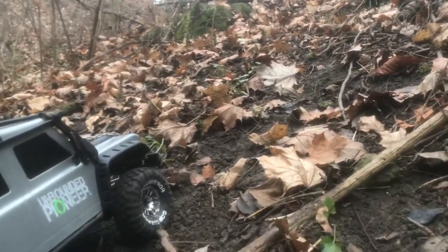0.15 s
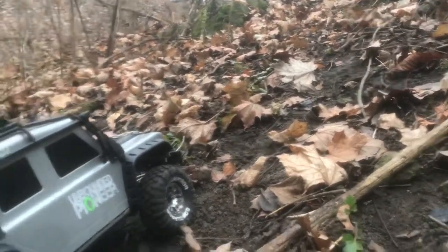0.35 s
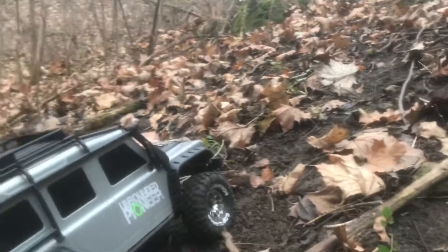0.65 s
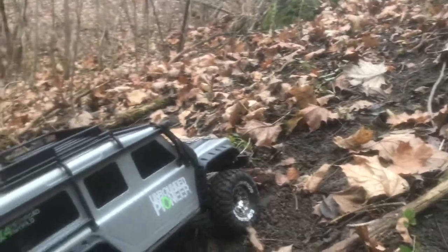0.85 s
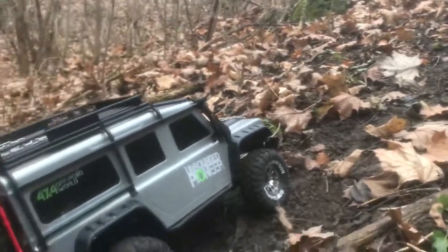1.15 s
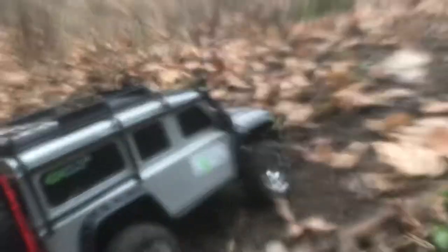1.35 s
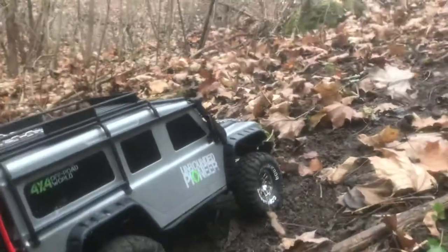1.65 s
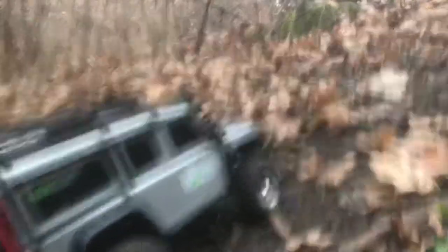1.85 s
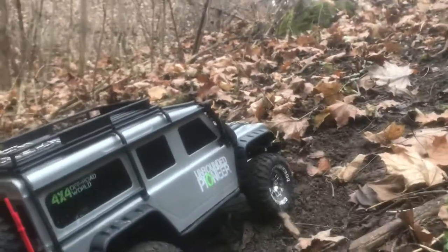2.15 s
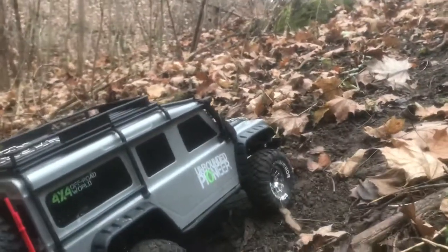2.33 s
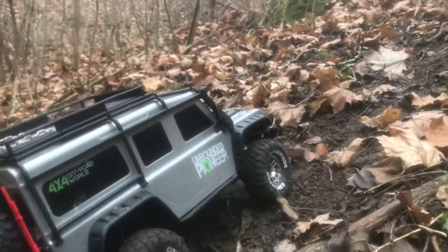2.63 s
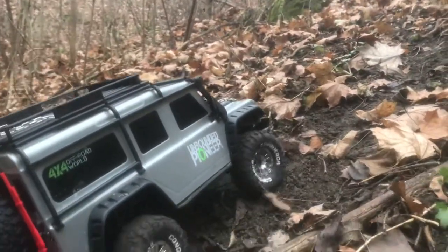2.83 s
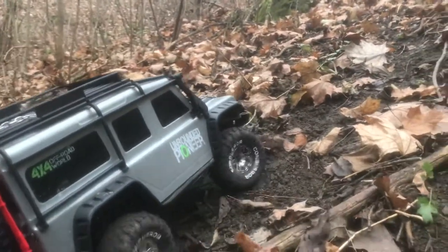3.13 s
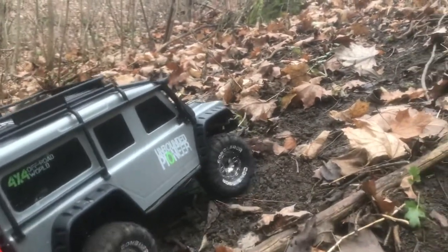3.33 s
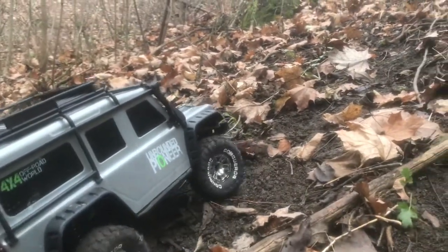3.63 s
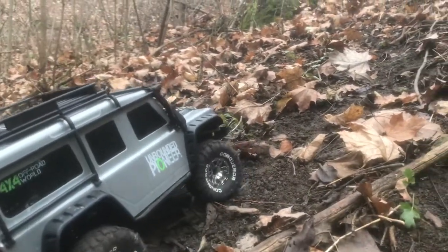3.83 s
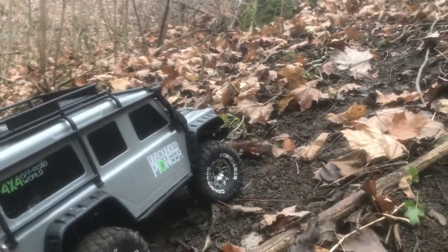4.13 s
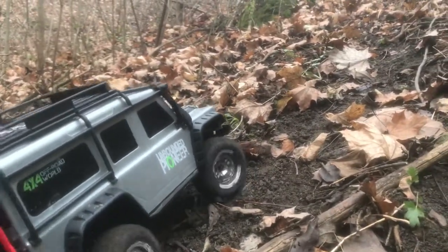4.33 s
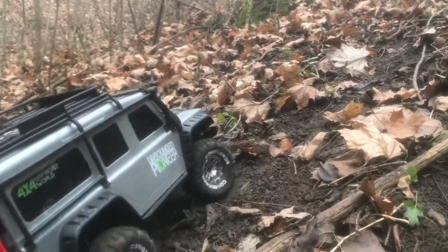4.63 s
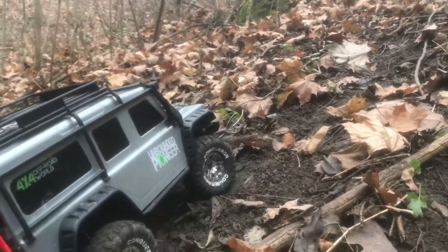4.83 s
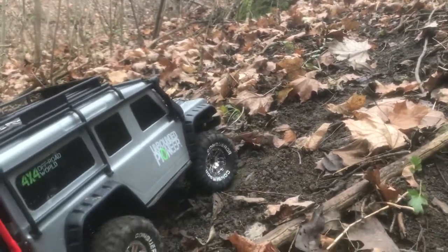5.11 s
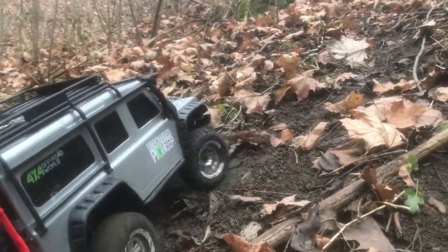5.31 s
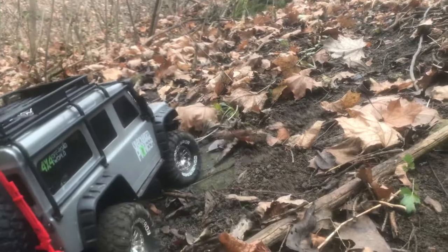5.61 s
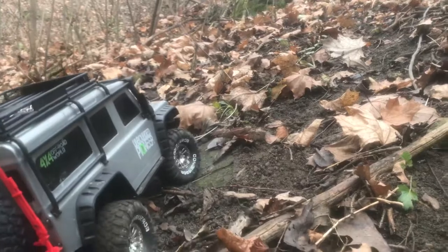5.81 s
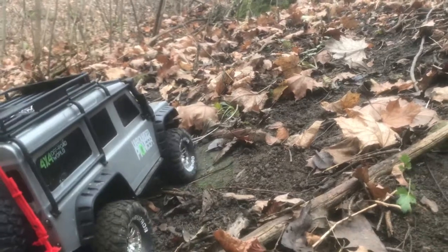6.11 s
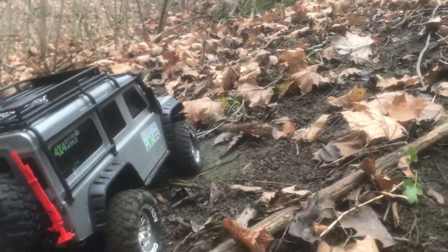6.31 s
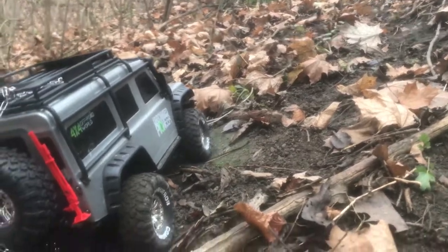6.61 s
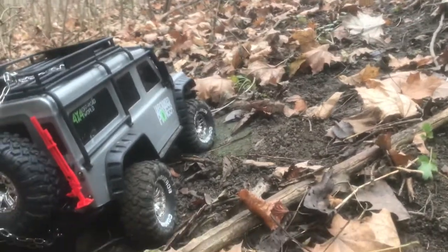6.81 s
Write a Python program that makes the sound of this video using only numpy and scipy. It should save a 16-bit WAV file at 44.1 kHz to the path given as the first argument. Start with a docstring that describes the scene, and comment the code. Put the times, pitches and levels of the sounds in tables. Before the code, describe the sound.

In quiet, echoless woodland with a soft low rumble, a close microphone picks up the low hum and gritty rattle of a model truck's gears. Twigs crack and the chassis knocks as the tyres crunch over dry leaves. The gear noise stops, and the wheels spin twice, scraping soil and crackling leaves. The plastic body clatters, and the electric motor finishes with a few faint, very high whistles over light rustling.

```python
"""Quiet woodland, a slope of soil and dry leaves; the microphone is close to a small electric model truck.
The truck crawls uphill, its gears humming, rattling and rasping with each turn of the shaft. The drive
dies away, then two bursts of wheelspin churn the litter. Twigs snap, blows ring the chassis, the loose
shell clacks and the motor sings thinly at low speed. A low rumble and a far-off hush lie under it all."""
import sys
import numpy as np
from scipy import signal
from scipy.fft import rfft, irfft, next_fast_len
from scipy.io import wavfile
from scipy.ndimage import map_coordinates

SR = 44100
rng = np.random.default_rng(int(sys.argv[2]) if len(sys.argv) > 2 else 0)


def materialize(psi):
    """Save the field psi as 16-bit PCM at rate SR to the path in sys.argv[1].

    A 1-D psi becomes a single channel; in a 2-D psi each row is a channel.
    """
    bounded = np.clip(np.atleast_2d(psi).T, -1, 1)
    quanta = np.round(bounded * 32767).astype(np.int16)
    wavfile.write(sys.argv[1], SR, quanta)


N = 306923


def from_db(db):
    """Decibels to gain."""
    return 10 ** (np.asarray(db) / 20)


def rms_one(x):
    """Scale to unit rms."""
    return x / np.sqrt(np.mean(x ** 2) + 1e-20)


def in_time(rows):
    """Join (time, value) points by straight lines."""
    return np.interp(np.arange(N) / SR, *np.transpose(rows))


def swell(start, length, rise_s, fall_s):
    """Exponential attack up to the start, a hold, then an exponential release."""
    t = np.arange(N) / SR - start
    log_gain = np.minimum(t / rise_s, 0) - np.maximum(t - length, 0) / fall_s
    return np.exp(np.maximum(log_gain, -40))


def coloured(x, spectrum):
    """Give x a spectrum, with minimum phase so that nothing sounds early; rms 1."""
    size = next_fast_len(N + 8192, real=True)
    hz, db = np.transpose(spectrum)
    log_hz = np.log(np.arange(size // 2 + 1) * SR / size + 1)
    skirt_db = 24 * np.minimum(log_hz - np.log(hz[0]), 0)
    gain = from_db(np.interp(log_hz, np.log(hz), db) + skirt_db)
    cepstrum = irfft(np.log(gain), size)
    cepstrum[size // 2:] = 0
    return rms_one(irfft(rfft(x, size) * np.exp(2 * rfft(cepstrum)), size)[:N])


def noise():
    """White noise."""
    return rng.standard_normal(N)


def drift(rate_hz):
    """A smooth random wander with spread 1."""
    r = np.exp(-80 * np.pi * rate_hz / SR)
    slow = signal.lfilter([1], [1, -2 * r, r * r], rng.standard_normal(N // 40 + 2002))[2000:]
    return np.interp(np.arange(N) / 40, np.arange(len(slow)), rms_one(slow))


def ring(times, levels_db, hz, t60):
    """Each blow sets a decaying sine ringing."""
    blows = np.zeros(N)
    blows[np.round(times * SR).astype(int)] = from_db(levels_db)
    r, w = from_db(-60 / (t60 * SR)), 2 * np.pi * hz / SR
    return signal.lfilter([0, np.sin(w)], [1, -2 * r * np.cos(w), r * r], blows + 1e-18)


def resonance(x, hz, width_hz, passes=1):
    """Two-pole band-pass with gain 1 on top; more passes steepen its sides."""
    r = np.exp(-np.pi * width_hz / SR)
    feedback = [1, -2 * r * np.cos(2 * np.pi * hz / SR), r * r]
    for _ in range(passes):
        x = signal.lfilter(np.array([1, 0, -1]) * (1 - r * r) / 2, feedback, x + 1e-18)
    return x


# low rumble of the place: (t/s, level/dB)
RUMBLE_LEVEL = [(0, -44), (.3, -45.5), (1.0, -46), (1.5, -50), (2.3, -47), (3.0, -43.5), (3.7, -42),
                (3.95, -47), (4.4, -40.5), (4.8, -46), (5.3, -42.5), (5.9, -47), (6.96, -48.5)]
# spectra of the rumble and of the distant air: (f/Hz, level/dB)
RUMBLE_SPECTRUM = [(20, -22), (32, -21.5), (48, -10.5), (62, 0), (78, 3.5), (90, -14), (105, -6.5),
                   (160, -24), (300, -77.5)]
AIR_SPECTRUM = [(80, 23), (150, 2), (250, -2.5), (450, -17), (700, -4.5), (1000, 6), (1500, -0.5),
                (2100, -6.5), (4000, -17), (7000, -14), (10400, -23.5), (12500, -13.5), (16000, -23)]

def woodland(air_db=-61):
    """All around the microphone, a low rumble swells and sinks under a faint far-off hush."""
    rumble = from_db(in_time(RUMBLE_LEVEL)) * coloured(noise(), RUMBLE_SPECTRUM)
    return rumble + from_db(air_db) * coloured(noise(), AIR_SPECTRUM)


def crawl(rows, turnover_s=.025):
    """Time away from the motor's top speed, rounded at the turn, and the gain at each resonance."""
    swells = np.array([swell(s, length, rise_s=.025, fall_s=.03) for s, length, *_ in rows])
    _, _, top_s, *levels_db = np.transpose(rows)
    from_top_s = np.arange(N) / SR - top_s[swells.argmax(axis=0)]
    away_s = np.hypot(from_top_s, turnover_s) - turnover_s
    return np.minimum(away_s, .3), from_db(levels_db) @ swells


# the motor's lower and upper resonance: (f/Hz, width/Hz, gain of the clear tone)
MOTOR_MODES = [(9050, 1100, .3), (12250, 1700, 1.0)]
# motor whistles: (t/s, length/s, top speed at t/s, lower level/dB, upper level/dB)
MOTOR_WHISTLES = [(2.675, 0.17, 2.85, -73, -55), (5.78, 0.092, 5.66, -69, -68), (6.0, 0.187, 5.9, -80, -74),
                  (6.52, 0.09, 6.583, -71, -70), (6.69, 0.072, 6.583, -82, -67),
                  (6.8, 0.07, 6.583, -82, -69.5)]

def whistles(sag_per_s=.07, waver=.007, hiss_gain=.9):
    """At a steady crawl each resonance hisses around a thin tone that flattens away from top speed."""
    away_s, gains = crawl(MOTOR_WHISTLES)
    out = 0
    for gain, (hz, width, tone_gain) in zip(gains, MOTOR_MODES):
        pitch = hz * (1 - sag_per_s * away_s + waver * drift(90))
        tone = rms_one(np.cos(2 * np.pi * np.cumsum(pitch) / SR) * from_db(3 * drift(60)))
        hiss = rms_one(resonance(noise(), hz, width, passes=2))
        out += gain * rms_one(tone_gain * tone + hiss_gain * hiss)
    return out


# motor squeaks: (t/s, length/s, top speed at t/s, lower level/dB, upper level/dB)
MOTOR_SQUEAKS = [(5.795, .03, 5.8, -70, -69), (6.568, .13, 6.583, -79, -62)]

def squeaks(top_hz=795, octaves_per_s=2.6, jitter=.003, weak=.25, hiss_gain=1.2, width_hz=3000):
    """The motor speeds up and slows again, so commutation partials arch through its resonances."""
    away_s, gains = crawl(MOTOR_SQUEAKS)
    commutation_hz = top_hz * 2 ** (-octaves_per_s * away_s) * (1 + jitter * drift(67))
    angle = 2 * np.pi * np.cumsum(commutation_hz) / SR
    # multiples of two and three are the strong partials
    partials = [(weak if k % 2 and k % 3 else 1) * np.cos(k * angle) for k in (11, 15, 16, 17, 18, 19)]
    pulses = rms_one(sum(partials))
    return sum(gain * rms_one(resonance(pulses + hiss_gain * noise(), hz, width_hz, passes=2))
               for gain, (hz, *_) in zip(gains, MOTOR_MODES))


# modes of the plastic shell: (f/Hz, level/dB, t60/s)
SHELL_MODES = [(435, -12.5, 0.069), (867, -8, 0.084), (1007, -5, 0.037), (1560, -2.5, 0.037),
               (1770, 1.5, 0.019), (2355, -6, 0.054), (2930, -6, 0.026), (3370, -10.5, 0.021),
               (4184, -6.5, 0.027), (5160, -9, 0.0099), (6230, -15, 0.016)]
# shell hits: (t/s, level/dB, brightness/dB per octave)
SHELL_HITS = [(1.327, -22.5, -5), (1.8308, -25.5, 6), (1.931, -27.5, -2), (2.737, -31.5, -1.5),
              (3.603, -40, 18.5), (3.716, -25.5, 1), (4.143, -39, -8), (4.587, -30, 4), (4.739, -44, -5.5),
              (5.062, -33.5, -1), (5.100, -32.5, 4), (5.189, -36, -8), (5.471, -22.5, -4.5),
              (5.711, -37, 8), (5.7219, -19, 1), (5.7312, -20, 4), (5.745, -24, 3), (5.751, -33, 3),
              (5.835, -39, 5.5), (6.021, -40.5, -6), (6.125, -42, 2), (6.490, -31, 3), (6.661, -31, -3.5)]
# spectrum of gritty contact, for both shell and tyres: (f/Hz, level/dB)
GRIT_SPECTRUM = [(450, -13), (950, 2.5), (1500, 1.5), (2000, -7), (2800, -1.5), (3300, -8), (4100, -8),
                 (5000, -11), (7000, -18.5), (14000, -22)]

def clacks(ring_db=-11, chatter_db=-15, chatter_s=.0095, pitch_spread=.058):
    """The loose shell hits its posts: each spot rings the modes its own way, and the contact chatters."""
    out, t = np.zeros(N), np.arange(4096) / SR
    hz, mode_db, t60 = np.transpose(SHELL_MODES)[:, :, None]
    grit = coloured(noise(), GRIT_SPECTRUM)
    for s, db, tilt in SHELL_HITS:
        span = slice(round(s * SR), round(s * SR) + len(t))
        strength, detune, side = rng.standard_normal((3, len(SHELL_MODES), 1))
        level_db = mode_db + tilt * np.log2(hz / 2000) + 2 * strength - 60 * t / t60
        sines = np.sign(side) * np.sin(2 * np.pi * hz * (1 + pitch_spread * detune) * t)
        ringing = np.sum(from_db(ring_db + level_db) * sines, axis=0)
        chatter = from_db(chatter_db) * np.exp(-t / chatter_s) * grit[span]
        out[span] += from_db(db) * (ringing + chatter)
    return out


# modes of the chassis and of the suspension: (f/Hz, level/dB, t60/s)
CHASSIS_MODES = [(486, -10.5, 0.025), (597, 3, 0.013), (840, -6, 0.017), (1220, -9.5, 0.011),
                 (1605, -16, 0.0082), (2460, -22.5, 0.0069), (3430, -27.5, 0.028), (4240, -27, 0.017)]
SUSPENSION_MODES = [(140, -2.5, 0.013), (223, -1, 0.015)]
# blows on the chassis, the last three rows soft thuds in the soil played the same way: (t/s, knock level/dB,
# thump level/dB, pitch ratio of the struck spot)
CHASSIS_BLOWS = [(1.3212, -8, -6, 0.98), (1.3535, -19, -15.5, 1.07), (1.8295, -16, -22.5, 1.11),
                 (1.882, -28, -45, 1.05), (1.9308, -19.5, -41, 1.13), (5.781, -58, -61, 1.0),
                 (5.929, -46, -68, 1.0), (6.657, -60, -52, 0.69)]

def knocks(jolt_s=.00196, lowest_hz=95):
    """A dull blow rings the chassis and jolts the suspension an instant later."""
    times, knock_db, thump_db, spot_ratios = np.transpose(CHASSIS_BLOWS)
    knock = 0
    for s, blow_db, ratio in zip(times, knock_db, spot_ratios):
        for k, (hz, db, t60) in enumerate(CHASSIS_MODES):
            pitch = hz * ratio if k < 3 else hz   # the lowest modes shift with the struck spot
            knock += (-1) ** k * ring(s, blow_db + db, pitch, t60)
    thump = sum(ring(times + jolt_s, thump_db + db, hz, t60) for hz, db, t60 in SUSPENSION_MODES)
    # the knocks carry no deep bass
    return signal.sosfilt(signal.butter(2, lowest_hz, "high", fs=SR, output="sos"), knock - thump)


# twigs breaking close by: (t/s, level/dB, centre f/Hz, splintering/dB relative to the crack)
TWIG_BREAKS = [(0.205, -21.5, 4000, -6), (1.3236, 4, 6240, -33), (1.3333, -5, 11000, -27),
               (1.3568, -1.5, 6150, -33), (1.3665, -12, 5900, -23), (1.8322, -19, 5860, -9),
               (2.825, -10.5, 6200, -14), (3.392, -18.5, 7000, -8), (3.4514, -22, 5000, -12),
               (3.603, -18, 5000, -10), (3.643, -25, 4000, -6), (3.7191, -16.5, 4470, -17),
               (4.32, -21, 7000, -6), (4.34, -19, 7000, -6), (4.458, -11, 7550, -16),
               (4.471, -17, 7500, -12), (4.5579, -12.5, 4200, -8), (5.078, -21, 9100, -10),
               (5.1202, -24.5, 8000, -8), (5.21, -18, 11000, -6), (5.3448, -13.5, 7040, -6),
               (5.350, -17, 10000, -6), (5.525, -21, 4800, -8), (5.5816, -20.5, 6000, -16),
               (5.7220, -9, 8060, -2), (5.733, -11.5, 8400, -5), (6.491, -25, 8000, -6)]

def snaps(splinter_s=.0021, width_hz=6000, gain_db=-1, hollow=.45):
    """Each twig gives one sharp crack and a brief splintering; the treble is slightly hollow."""
    out, t = np.zeros(N), np.arange(1024) / SR
    splinters = noise()
    for s, db, hz, splinter_db in TWIG_BREAKS:
        span = slice(round(s * SR), round(s * SR) + len(t))
        burst = (t == 0) + from_db(splinter_db) * splinters[span] * np.exp(-t / splinter_s)
        crack = resonance(burst, hz, width_hz)
        out[span] -= from_db(db + gain_db) * crack / np.linalg.norm(crack)
    return out - hollow * resonance(out, hz=9800, width_hz=2200)


def crunch(per_s, spread_db, grain_s, clump_db, bed_db):
    """Tiny fractures of uneven size, each a short burst, over a bed of rubbing; clump_db bunches them."""
    born = rng.random(N) < per_s / SR
    sizes = from_db(spread_db * np.minimum(rng.exponential(1, N), 4))
    power = signal.lfilter([1], [1, -np.exp(-2 / (grain_s * SR))], born * sizes ** 2 + 1e-18)
    envelope = np.sqrt(power / power.mean() + from_db(bed_db) ** 2)
    return noise() * envelope * from_db(clump_db * drift(40))


# tyres rolling over the litter: (t/s, level/dB)
ROLLING_LEVEL = [(0, -57.5), (1.2, -53.5), (1.9, -51), (2.6, -47.5), (2.85, -49.5), (3.7, -51.5),
                 (3.8, -64), (4.0, -69.5), (4.72, -64.5), (4.95, -72.5), (5.8, -60.5), (6.38, -71.5),
                 (6.65, -64), (6.95, -71.5)]
# a tyre slips and digs in, or spins: (t/s, length/s, level/dB, leaves/dB relative to it)
TYRE_SLIPS = [(2.7, 0.014, -45.5, -9), (2.88, 0.019, -44, -1), (3.034, 0.023, -46, -2),
              (3.099, 0.07, -48.5, -1.5), (3.348, 0.045, -49, -9), (3.46, 0.07, -51, -1),
              (3.603, 0.0054, -41, -7.5), (3.724, 0.013, -54, -24), (3.814, 0.06, -71.5, 10.5),
              (4.198, 0.16, -49, -13), (4.311, 0.059, -36.5, -6.5), (4.423, 0.026, -38, -3.5),
              (4.553, 0.051, -43.5, -11), (4.692, 0.08, -77, 13.5), (5.103, 0.02, -45.5, -19),
              (5.224, 0.055, -38, -6.5), (5.318, 0.051, -38, -9), (5.419, 0.076, -42, -7),
              (5.545, 0.031, -56, 4), (5.835, 0.25, -75, 3), (6.065, 0.11, -74.5, 2),
              (6.516, 0.28, -74, 4.5)]

def tread(rolling_leaves_db=-10, inertia=.15):
    """How hard the tyres work the ground and the leaves on it: steady rolling plus slips."""
    rolling = from_db(in_time(ROLLING_LEVEL))
    ground_power, litter_power = rolling ** 2, (rolling * from_db(rolling_leaves_db)) ** 2
    for s, length, db, leaves_db in TYRE_SLIPS:
        lag_s = inertia * length   # a long spin builds and fades more slowly
        slip = from_db(db) * swell(s, length, rise_s=.022 + lag_s, fall_s=.025 + lag_s)
        ground_power += slip ** 2
        litter_power += (slip * from_db(leaves_db)) ** 2
    return np.sqrt(ground_power), np.sqrt(litter_power)


# spectra of crushed soil and dry leaves: (f/Hz, level/dB)
SOIL_SPECTRUM = [(50, -16), (110, 3.5), (280, 7.5), (480, 2.5), (750, 0.5), (1200, -7), (2500, -50)]
LEAF_SPECTRUM = [(1500, -6), (2800, -3), (4200, 7), (5000, -0.5), (6000, 3.5), (7600, -5.5), (8500, 1),
                 (10400, -5), (12000, 0), (16000, -10)]

def tyres(soil_db=3, grit_db=-2.5, leaves_db=3, digging=.013, firm_db=-50):
    """The tread churns soil, scrapes grit and crumbles leaves; harder work favours soil over grit."""
    ground, litter = tread()
    soil = crunch(per_s=150, spread_db=1.5, grain_s=.0022, clump_db=0, bed_db=-1.5)
    grit = crunch(per_s=300, spread_db=3.5, grain_s=.003, clump_db=1, bed_db=-6)
    leaves = crunch(per_s=1300, spread_db=5, grain_s=.0013, clump_db=3, bed_db=-3.5)
    depth = (ground / from_db(firm_db)) ** digging
    return (from_db(soil_db) * ground * depth * coloured(soil, SOIL_SPECTRUM)
            + from_db(grit_db) * ground / depth * coloured(grit, GRIT_SPECTRUM)
            + from_db(leaves_db) * litter * coloured(leaves, LEAF_SPECTRUM))


# partials of the drive: (multiple of the shaft rate, level/dB)
SHAFT_ORDERS = [(1, 2), (2, -16), (2.5, -18), (3, -.5), (3.5, -15), (4, -22), (5, -11.5), (6, -13),
                (7, -16.5), (8, -12), (9, -23), (10, -18), (11, -23), (12, -23.5), (13, -21.5), (14, -18),
                (15, -24.5), (16, -25.5), (17, -24.5), (19, -23.5), (20, -25.5)]

def shaft_hum(angle, waver_db=1.5):
    """The shaft hums at multiples of its turning rate, each wavering in level."""
    return rms_one(sum(from_db(db + waver_db * drift(5.7)) * np.cos(k * angle + rng.uniform(0, 2 * np.pi))
                       for k, db in SHAFT_ORDERS))


def tooth_force(angle, idler_angle):
    """The teeth bite unevenly through each turn, and a slower idler wheel beats against the shaft."""
    idler = rms_one(sum(np.cos(k * idler_angle + rng.uniform(0, 2 * np.pi)) for k in (3, 4, 6, 7, 10)))
    force = np.cos(angle) + .97 * np.cos(2 * angle + 1) + .99 * idler
    return np.tanh(force)   # bounded, so the ticks stay even


def tooth_errors(angle, points):
    """A wheel's uneven teeth give the same rough pattern on every turn."""
    position = angle / (2 * np.pi) * points % points
    return map_coordinates(rng.standard_normal(points), [position], order=3, mode="grid-wrap")


# spectrum of the gearbox rattle: (f/Hz, level/dB)
RATTLE_SPECTRUM = [(90, -42.5), (150, -18.5), (280, 3.5), (430, 6), (620, 3.5), (800, -12), (1100, -19),
                   (1500, -5.5), (2000, -18.5), (3500, -39)]

def gear_rattle(angle, force, idler_errors, repeat_share=.5, bite=.7, backlash=.45):
    """Loose play and the idler's uneven teeth rattle as they mesh, throbbing on every second turn."""
    play = np.sqrt(1 - repeat_share) * noise() + np.sqrt(repeat_share) * idler_errors
    return coloured(play * np.exp(bite * force + backlash * np.cos(angle / 2)), RATTLE_SPECTRUM)


# spectrum of the gearbox rasp: (f/Hz, level/dB)
RASP_SPECTRUM = [(1200, -24.5), (2100, 8), (2350, 3), (2700, 5.5), (3300, -1), (4100, 6), (4900, -9.5),
                 (5800, -4.5), (6600, -1), (7800, -8.5), (8700, -19), (10300, -24.5), (11900, -16),
                 (16000, -39)]

def gear_rasp(angle, force, shaft_errors, repeat_gain=.31, tick_depth=.8, scatter_db=.7):
    """The teeth rasp with an even tick once a turn; part of their roughness repeats."""
    roughness = noise() + repeat_gain * shaft_errors
    ticks = np.exp(tick_depth * np.tanh(np.cos(angle) + .5 * force))
    return coloured(roughness * ticks * from_db(scatter_db * drift(90)), RASP_SPECTRUM)


# modes of the scraped gear: (f/Hz, width/Hz, level/dB)
GEAR_RESONANCES = [(3850, 400, 0), (4220, 440, -1.5), (5620, 480, -2.5), (8700, 1200, -11.5),
                   (11700, 1400, -15.5), (13600, 1700, -19)]

def gear_scrape(angle, pulse_depth=.6):
    """A tooth flank scrapes once a turn and rings the gear."""
    scrape = noise() * np.exp(pulse_depth * np.cos(angle) + .1 * drift(50))
    return rms_one(sum(from_db(db) * resonance(scrape, hz, .99 * width, passes=2)
                       for hz, width, db in GEAR_RESONANCES))


# turning rate of the drive shaft: (t/s, f/Hz)
SHAFT_RATE = [(0, 78.6), (1.2, 78.8), (2.0, 78.6), (2.7, 78.3), (3.1, 79.5), (3.6, 80.0), (3.75, 78.4),
              (3.83, 74.0)]
# load on the drive: (t/s, level/dB)
DRIVE_LOAD = [(0, -50), (.18, -49.5), (.22, -42), (.95, -45), (1.14, -42.5), (1.3, -42.5), (1.44, -44),
              (1.95, -46), (2.35, -41), (2.72, -44.5), (2.82, -50), (3.5, -47), (3.72, -43), (3.83, -66)]
# the gears bind: (t/s, length/s, level/dB, ringing/dB relative to it)
GEAR_STRAINS = [(0.318, 0.086, -52.5, 1), (0.63, 0.22, -53, 1), (1.07, 0.014, -57.5, 0),
                (1.615, 0.017, -62.5, 0), (2.216, 0.072, -52, -6), (2.45, 0.21, -55, -6)]

def drive(hum_db=3, rattle_db=-4.5, rasp_db=-13, strain_rasp_db=-3, wander_db=1.2,
          idler_ratio=30.2 / 78.6, take_up_s=.17, coast_s=.02):
    """Close up, the gear train hums, rattles and rasps with its load, and rings where it binds."""
    shaft_hz = in_time(SHAFT_RATE) * (1 + .002 * drift(20))
    angle = 2 * np.pi * np.cumsum(shaft_hz) / SR
    idler_angle = idler_ratio * angle
    hum = shaft_hum(angle)
    force = tooth_force(angle, idler_angle)
    rattle = gear_rattle(angle, force, tooth_errors(idler_angle, 1024))
    rasp = gear_rasp(angle, force, tooth_errors(angle, 128))
    ringing = gear_scrape(angle)

    stop_s = SHAFT_RATE[-1][0]
    load = from_db(in_time(DRIVE_LOAD)) * swell(0, stop_s, rise_s=.05, fall_s=coast_s)
    strains = np.array([from_db(db) * swell(s, length, rise_s=.05, fall_s=.16)
                        for s, length, db, _ in GEAR_STRAINS])
    ring_gain = from_db([ring_db for *_, ring_db in GEAR_STRAINS]) @ strains
    # the load makes the teeth rasp only once the slack is taken up
    engaged = load * swell(take_up_s, N / SR, rise_s=.018, fall_s=coast_s)
    rasp_gain = np.hypot(engaged * from_db(rasp_db + wander_db * drift(27)),
                         strains.sum(axis=0) * from_db(strain_rasp_db))
    body = load * (from_db(hum_db) * hum + from_db(rattle_db) * rattle)
    return body + rasp_gain * rasp + ring_gain * ringing


def scene():
    """One microphone close to the truck; the open wood returns no echo."""
    truck = drive() + tyres() + knocks() + snaps() + clacks() + squeaks() + whistles()
    return (woodland() + truck)[None, :]


def record(dry, cutoff_hz=15900):
    """The top of the microphone's signal is cut steeply."""
    return signal.sosfilt(signal.ellip(10, .2, 80, cutoff_hz, fs=SR, output="sos"), dry)


dry = scene()
out = record(dry)
materialize(out)
```